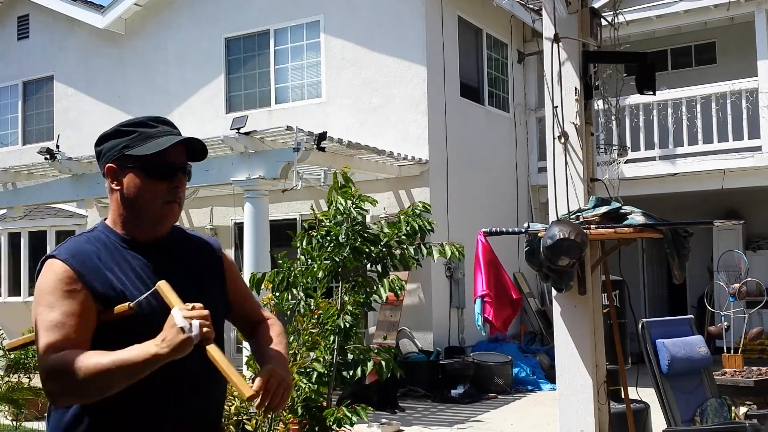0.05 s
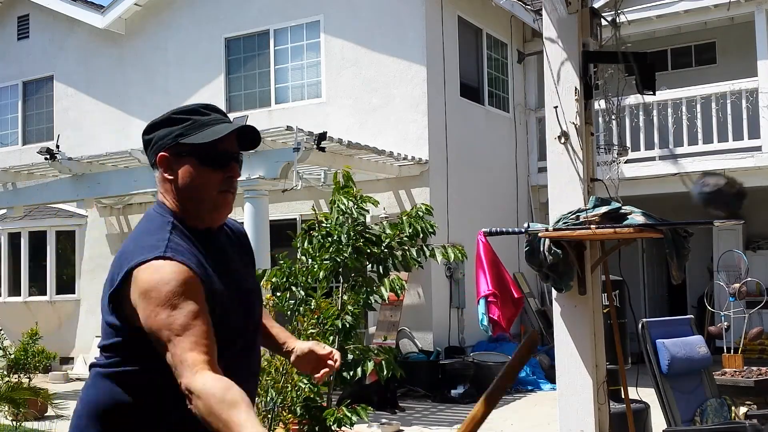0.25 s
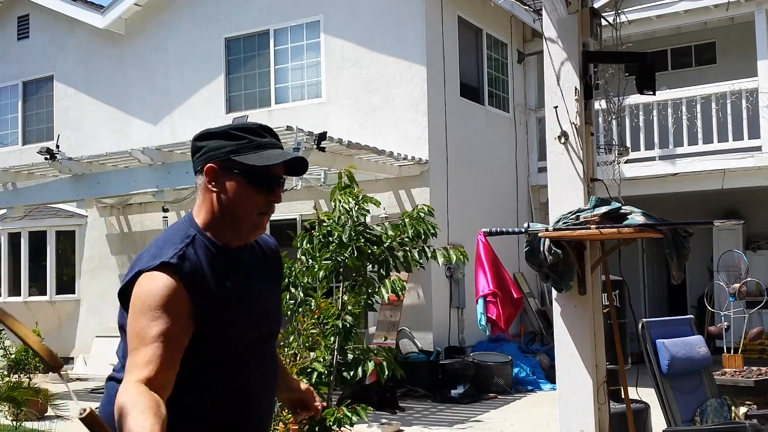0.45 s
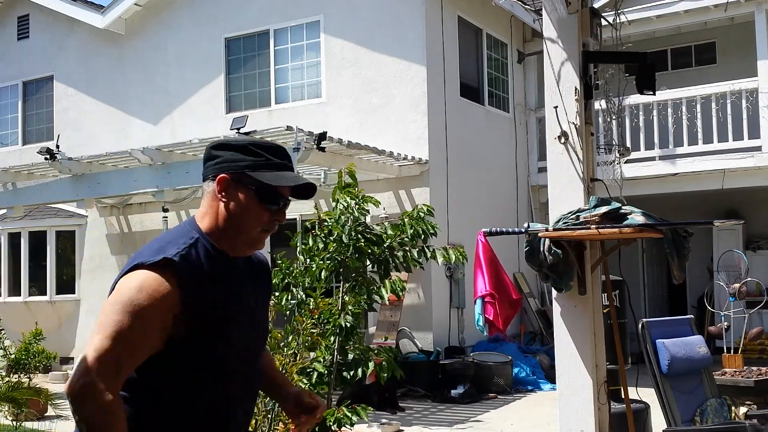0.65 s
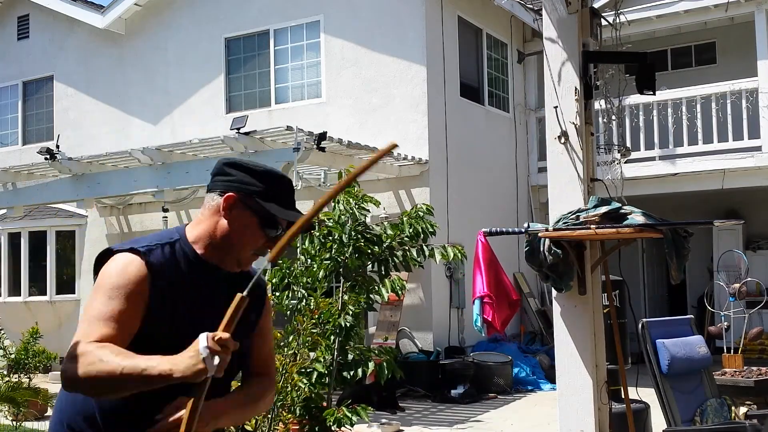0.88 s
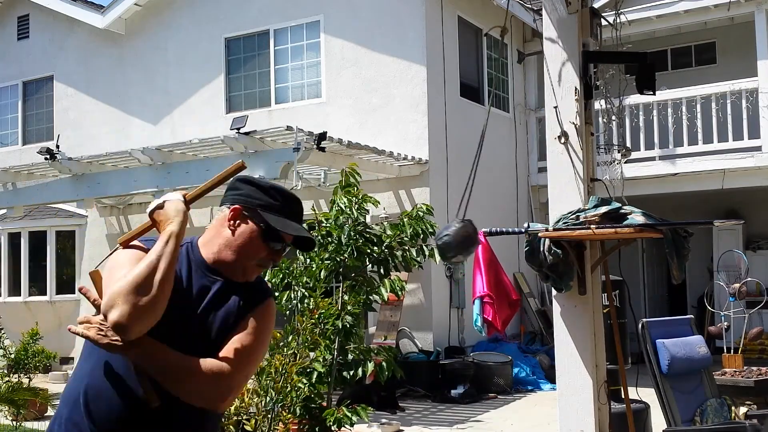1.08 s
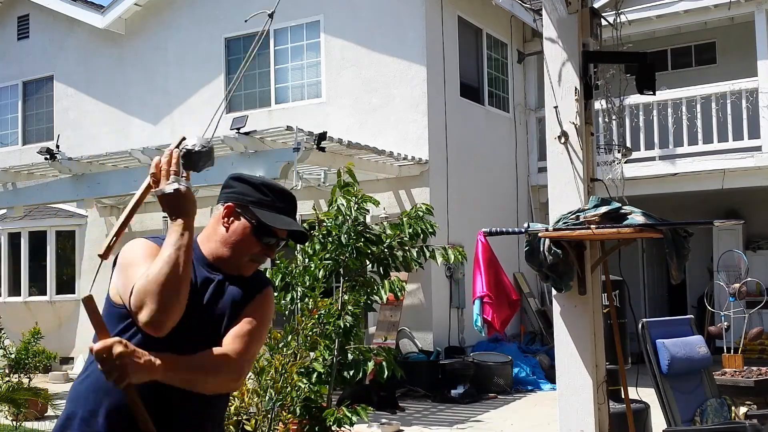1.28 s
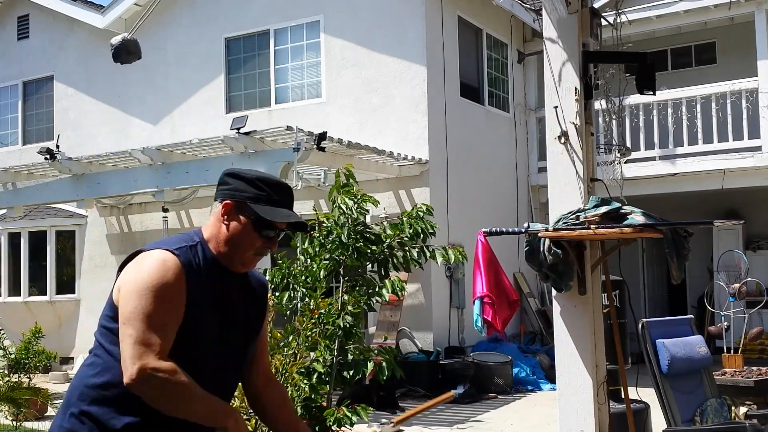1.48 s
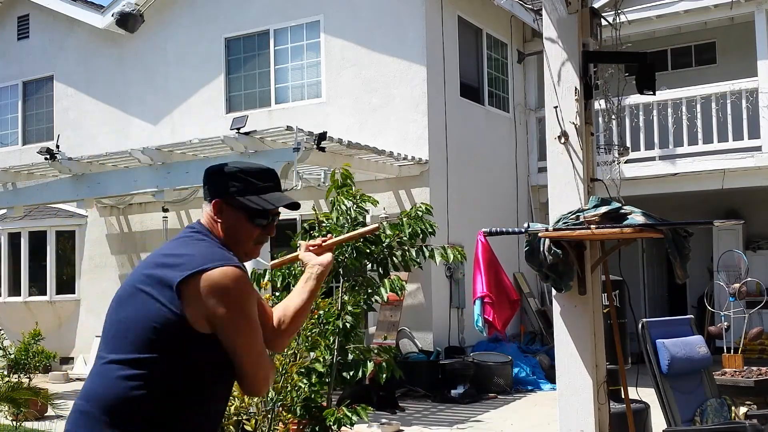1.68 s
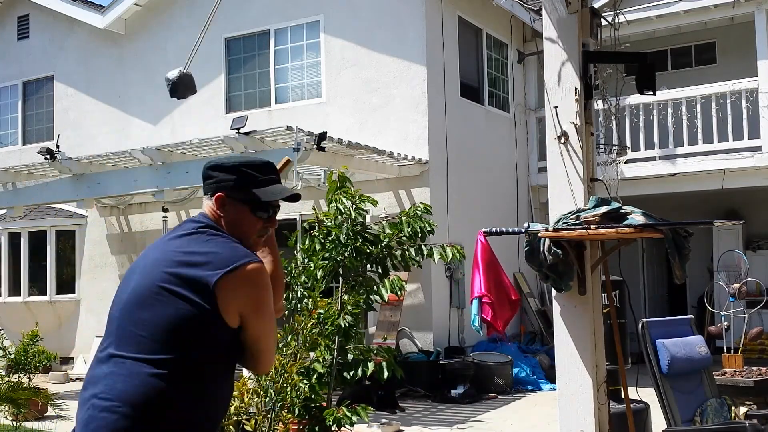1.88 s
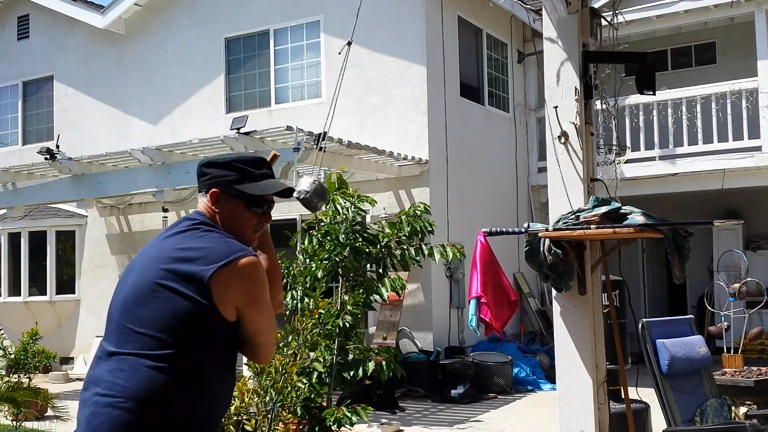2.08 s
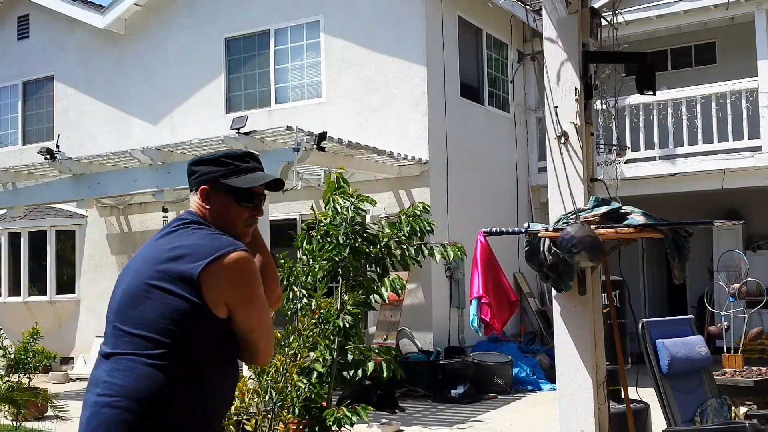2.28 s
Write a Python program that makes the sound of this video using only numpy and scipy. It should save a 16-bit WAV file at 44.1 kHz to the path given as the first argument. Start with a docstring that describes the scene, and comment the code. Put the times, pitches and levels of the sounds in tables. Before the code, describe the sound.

Two quick wooden knocks of sticks on a hanging ball echo briefly in a quiet yard. After a low swish and faint chirps, clothes and shoes rustle while wind rumbles and pops loudly on the microphone.

```python
"""A paved yard under a faint outdoor hush. Clothes and shoes rustle, and wind buffets the two microphone
ports. At 0.2 s and 0.48 s wooden sticks strike a ball hanging on a cord: stick and ball ring, the house
walls throw the cracks back, and the second stroke swishes on past the ball. Small ticks and faint,
bird-like chirps follow, then wind and rustle swell again. From 1.9 s a thin whistle falls away, and
at 2 s the wind pops the left port."""
import sys
import numpy as np
from scipy import signal
from scipy.fft import rfft, irfft
from scipy.io import wavfile
from scipy.ndimage import uniform_filter1d, map_coordinates

SR = 44100
rng = np.random.default_rng(int(sys.argv[2]) if len(sys.argv) > 2 else 0)


def generate_wav(signal):
    """Clip the signal to [-1, 1] and save it as 16-bit WAV at the path in sys.argv[1]."""
    frames = np.transpose(np.atleast_2d(signal))
    scaled = np.clip(frames, -1, 1) * 32767
    pcm = np.round(scaled).astype(np.int16)
    wavfile.write(sys.argv[1], SR, pcm)


N = 108045
T = np.arange(N) / SR
HZ = np.arange(N // 2 + 1) * SR / N + 1

# Pan is left minus right; lag is how late the right port hears; EQ levels are relative, per Hz.
# EQ of the outdoor bed: f/Hz, level/dB
HUSH_EQ = [(25, -22), (50, -6.5), (100, 2), (220, -8.5), (450, -10), (1200, -17.5), (2000, -17),
           (3200, -20), (6200, -19), (9000, -29.5), (13000, -38), (15000, -69)]
# path of the falling whistle: t/s, f/Hz, level/dB
WHISTLE_PATH = [(1.92, 5450, -60), (2.01, 4880, -56), (2.065, 4660, -51), (2.14, 4500, -55),
                (2.22, 4320, -56.5), (2.33, 4210, -60), (2.42, 4080, -61), (2.45, 4050, -66)]
# swell of the breeze's rumble: t/s, level/dB
BREEZE_SWELL = [(0, -44), (.2, -46), (.35, -61), (.6, -54.5), (.8, -63.5), (1.15, -64), (1.34, -54),
                (1.41, -44.5), (1.6, -45), (1.75, -45.5), (1.88, -42), (2.05, -49.5), (2.18, -48.5),
                (2.32, -47.5), (2.45, -53)]
# EQ of that rumble: f/Hz, level/dB
BREEZE_EQ = [(20, -24), (50, -9.5), (105, 1.5), (170, -7.5), (300, -14.5), (600, -54.5)]
# wind buffets on the ports: t/s, half length/s, level/dB, pan/dB, high cut/Hz
BUFFETS = [(0.015, 0.0096, -39, -16, 107), (0.09, 0.0051, -38, -16, 150), (0.1, 0.051, -44.5, 0, 141),
           (0.636, 0.038, -50, -13, 220), (0.936, 0.0085, -45.5, -20.5, 214),
           (0.986, 0.014, -52.5, -16.5, 209), (1.234, 0.012, -46.5, -30, 183),
           (1.272, 0.013, -43, -20, 234), (1.431, 0.0065, -34, -13, 132),
           (1.462, 0.0077, -35.5, -20.5, 325), (1.495, 0.015, -35.5, -13, 226)]
# swell of clothes and shoes: t/s, level/dB, pan/dB
RUSTLE_SWELL = [(0, -39.5, 1), (.065, -39.5, 1.5), (.13, -39, 3), (.19, -41.5, 2.5), (.40, -52, 4.5),
                (.46, -54, 5), (.6, -51.5, 1.5), (.76, -60.5, 5.5), (.93, -55, 4), (1.10, -61.5, 5),
                (1.21, -60, 11), (1.285, -47, 3.5), (1.33, -51.5, 4), (1.39, -44.5, 2), (1.44, -47.5, 2),
                (1.63, -40.5, 1.5), (1.76, -41.5, 4), (1.89, -42.5, 1), (1.97, -41, 3), (1.997, -54.5, 6),
                (2.025, -41, 3), (2.09, -44.5, 1.5), (2.3, -46.5, 2.5), (2.45, -47.5, 3)]
# EQ of the rustle: f/Hz, level/dB
RUSTLE_EQ = [(150, -25.5), (320, -2), (700, -4), (1000, -2), (1400, -7.5), (2000, -2.5), (2900, -8),
             (4300, -10), (6000, -5), (8000, -12), (11000, -22.5), (13000, -31.5), (15000, -60)]
# scuffs, squeaks and, around 0.8-1.0 s, bird-like chirps:
# t/s, f/Hz, level/dB, half length/s, pan/dB, relative width, slide/(octaves per s)
SQUEAKS_AND_CHIRPS = [(0.015, 5800, -36, 0.0045, 5, .3, -3), (0.059, 1950, -36.5, 0.011, 8.5, 0.6, 0),
                      (.402, 2340, -49, .005, 6, .25, 0), (.635, 855, -50, .02, 0, .6, 0),
                      (.822, 3300, -53.5, 0.015, 4, 0.21, -18.5), (.862, 5930, -43, 0.00095, 12, 0.13, 0),
                      (0.875, 3030, -58, 0.025, 2, 0.15, 2.5), (0.908, 1600, -57.5, .012, 8, 0.3, 2.5),
                      (0.936, 7540, -49.5, 0.006, 1, 0.3, 1), (0.951, 5800, -51, 0.0033, 4, .2, 0),
                      (0.966, 2150, -56.5, 0.0051, 11, 0.13, -2),
                      (0.967, 3480, -54.5, 0.0057, 5, 0.17, -14), (.997, 2500, -57, 0.0055, 8, 0.16, 10),
                      (1.119, 6200, -53.5, .004, 3, .2, 0), (1.665, 6400, -44, 0.0068, 3, 0.41, 0),
                      (1.722, 2080, -46.5, 0.011, 15, 0.34, 1), (1.74, 800, -45.5, 0.016, 2.5, .6, 0),
                      (1.824, 940, -46, 0.021, 3, 0.5, 0.5), (1.845, 7850, -31.5, 0.0023, 0, 0.079, 0),
                      (1.871, 5750, -42.5, 0.0046, 9, .15, 0), (1.939, 5800, -39, .003, 8.5, 0.2, 0),
                      (2.102, 5800, -44, .003, 10, .12, 0), (2.182, 5940, -44, 0.006, 13, 0.12, 2),
                      (2.406, 6760, -43.5, 0.0045, 3, 0.17, 0)]
# ticks of sticks, cord and shoes: t/s, level/dB, pan/dB, f/Hz, t60/s
TICKS = [(0.1933, -29.5, 3, 5200, 0.0055), (.1995, -38, -2, 5500, .03), (0.4292, -42.5, 5, 7500, 0.015),
         (.455, -44.5, 5, 5800, 0.018), (0.6237, -31, -8, 4380, 0.012), (1.041, -46, -4, 5200, 0.075),
         (1.374, -51.5, -11, 4540, .08), (1.397, -47.5, -5, 7500, .012), (1.605, -40, -6, 3340, 0.096),
         (1.741, -39.5, 4, 3500, 0.055), (1.815, -45.5, -1, 3700, 0.18)]
# path of the follow-through's swish: t/s, f/Hz, level/dB
SWISH_PATH = [(.47, 751, -61), (.487, 601, -35), (.505, 445.6, -35), (.518, 335, -33), (.532, 226.5, -40),
              (.58, 209, -48), (.64, 170, -64)]
# EQ of the cracks and the yard's echo: f/Hz, level/dB
YARD_EQ = [(100, -25), (250, -4.5), (400, -6), (580, -3.5), (780, -5.5), (1300, -5.5), (2800, -8),
           (4300, -7), (5800, 0.5), (8000, -7.5), (11000, -19.5), (13000, -30.5), (15000, -50)]
# narrow rings that hang on after a blow: f/Hz, relative level/dB
RINGS = [(409, -15.5), (481, -14.5), (530, -16.5), (600, -11), (980, -14), (1363, -17.5), (1513, -21),
         (2336, -20), (3890, -17), (4486, -19), (4810, -21), (5190, -18), (5270, -22), (5813, -19),
         (6250, -19), (6550, -22), (6845, -15), (8250, -20), (8830, -25)]
# early slaps off paving and walls: pan/dB, lag/s, send from first blow/dB, send from second/dB
SLAPS = [(-4, .0001, -20, -17), (2, .0001, -12, -24), (1, .0003, -14.5, -15), (-1.5, 0.0033, -5.5, -16)]
SLAP_DELAYS_S = (.0021, .0053, .0127, .0187)
# modes of stick and ball: f/Hz, t60/s, weight in first blow/dB, weight in second/dB
KNOCK_MODES = [(484, 0.022, -3, -11), (790, 0.027, -16, -5.5), (1210, 0.0082, -6, -4),
               (1485, 0.0076, -3.5, 5.5), (1860, 0.02, -9.5, 2.5), (2374, 0.037, -22, 0),
               (3090, 0.0084, -6, 4), (3780, 0.0092, -10, 4), (4210, 0.017, -10, 0.5),
               (5080, 0.0055, 4.5, -15), (5800, 0.0091, 3, 5), (6620, 0.0055, -5, 2),
               (7450, 0.0057, -4, -11), (8340, 0.0042, -3, 7)]
# the two blows: t/s, knock gain/dB, pan/dB, lag/s, echo level/dB, tilt of the yard EQ/(dB per octave),
# crack level within the knock/dB, gain of the rings/dB
BLOWS = [(0.2034, -3, 1, 0.00001, -19, -0.5, -4.5, -10.5),
         (0.4794, -15.5, 5, 0.00025, -26, -2.5, 0.5, -27.5)]
# tone difference between the microphone ports: f/Hz, left minus right/dB
PORT_BALANCE = [(400, 0), (1100, 2), (2200, 3.5), (5000, 1.5), (8500, -5.5), (14000, -18.5)]


def undb(db):
    """Decibels to gain."""
    return 10 ** (np.asarray(db) / 20)


def unit(x):
    """Scale to rms 1."""
    return x / np.sqrt(np.mean(x ** 2))


def pan(db):
    """Left and right gains for a level difference."""
    return undb(np.array([db, -db]).reshape(2, -1) / 2)


def curve(table):
    """The columns of a timed table, joined by straight lines."""
    times, *columns = np.array(table).T
    return [np.interp(T, times, c) for c in columns]


def noise(gain, likeness):
    """Stereo noise of rms 1 with spectrum gain(HZ); likeness runs from 0 (wide) to 0.98 (nearly mono)."""
    mid, side = rfft(rng.standard_normal((2, N)))
    spectrum = np.sqrt(1 + likeness) * mid + np.sqrt(1 - likeness) * side * np.array([[1], [-1]])
    return unit(irfft(spectrum * gain(HZ), N))


def eq(points, tilt_db=0.):
    """A spectrum through (Hz, dB) points, tilted per octave."""
    hz, db = np.array(points).T
    return lambda f: undb(np.interp(np.log(f), np.log(hz), db)
                          + tilt_db * np.log2(np.clip(f, hz[0], hz[-1])))


def band(hz, width):
    """A resonant band of relative width."""
    return lambda f: 1 / (1 + ((f / hz - hz / f) / width) ** 2)


def decay(start, t60):
    """A hard attack and an exponential tail."""
    return (T >= start) * np.exp(-np.log(1000) * np.clip((T - start) / t60, 0, 10))


def delay(x, seconds):
    """Delay a signal by whole samples."""
    return np.interp(np.arange(N) - np.round(seconds * SR), np.arange(N), x, left=0, right=0)


def wander(per_s):
    """Smooth random motion with a spread near 1."""
    span = int(SR / per_s)
    return unit(uniform_filter1d(uniform_filter1d(rng.standard_normal(N), span), span))


def glide(path, width, steady):
    """A noise band and a pure tone following a path; steady is the tone's share of the power."""
    hz, db = curve(path)
    flutter = noise(lambda f: 1 / (1 + (2 * f / (width * hz.mean())) ** 2), likeness=0.98)
    wobble = np.sqrt(steady) + np.sqrt(1 - steady) * flutter
    tone = np.sqrt(2) * np.sin(2 * np.pi * np.cumsum(hz) / SR)
    gate = (T > path[0][0]) * (T < path[-1][0])
    return undb(db) * gate * wobble * tone


def mode(start, hz, t60, turns=0.):
    """A struck, decaying sine, cut after a quarter of a second."""
    age = T[:int(.25 * SR)]
    ring = np.exp(-np.log(1000) * age / t60) * np.sin(2 * np.pi * (hz * age + turns))
    return np.pad(ring, (int(start * SR), N))[:N]


def hush():
    """A faint, wide bed of distant outdoor noise."""
    return undb(-54) * noise(eq(HUSH_EQ), likeness=0.26)


def whistle():
    """A thin, fluttering whistle slides down on the right."""
    return glide(WHISTLE_PATH, width=0.023, steady=0.34) * pan(-9)


def wind():
    """A low breeze, and short buffets that strike mostly one port."""
    out = undb(curve(BREEZE_SWELL)[0]) * noise(eq(BREEZE_EQ), likeness=0.86)
    for start, length, db, pan_db, top_hz in BUFFETS:
        eddy = noise(lambda f: f / np.hypot(f, 60) / (1 + (f / top_hz) ** 4), likeness=0)
        out += undb(db) * pan(pan_db) * np.exp(-((T - start) / length) ** 2 / 2) * eddy
    return out


def port_pop(start_s=2.0027, step_db=3.5, bass_cut_hz=92.6, damping=0.75, ceiling=0.92):
    """A pressure step overloads the left port; the microphone's bass cut swings it back to rest."""
    omega = 2 * np.pi * bass_cut_hz
    bass_cut = signal.bilinear([1, 0, 0], [1, 2 * damping * omega, omega ** 2], SR)
    thump = signal.lfilter(*bass_cut, undb(step_db) * (T >= start_s))
    return np.array([np.minimum(thump, ceiling), np.zeros(N)])


def rustle(grain_db=2.5, flutter_db=0.4, patch_db=2.5, diffuse_hz=1190, lag_s=.00042):
    """Cloth and soles rub with the player's motion: a grainy, patchy hiss."""
    db, pan_db = curve(RUSTLE_SWELL)
    grain = unit(undb(grain_db * wander(per_s=800) + flutter_db * wander(per_s=72)))
    likeness = 0.92 / (1 + (HZ / diffuse_hz) ** 2)  # the highs arrive from all sides
    hiss = rfft(noise(eq(RUSTLE_EQ), likeness))
    third_octave = np.floor(3 * np.log2(np.clip(HZ, 250, 11000)))
    patchy = sum(irfft(hiss * (third_octave == k), N) * undb(patch_db * wander(per_s=42))
                 for k in np.unique(third_octave))  # each band flickers on its own
    out = undb(db) * pan(pan_db) * grain * unit(patchy)
    out[1] = delay(out[1], lag_s)  # the player stands to the left
    return out


def squeaks_and_chirps():
    """Clothes and shoes scuff and squeak; faint, bird-like chirps sound around 0.8-1.0 s."""
    out = np.zeros((2, N))
    for peak_s, hz, db, length, pan_db, width, slide in SQUEAKS_AND_CHIRPS:
        speed = 2 ** (slide * np.clip(T - peak_s, -3 * length, 3 * length))  # bends the pitch
        position = peak_s * SR + np.cumsum(speed) - speed[T < peak_s].sum()
        hiss = noise(band(hz, width), likeness=0.27)
        bent = np.array([map_coordinates(side, [position], order=1, mode="mirror") for side in hiss])
        out += undb(db) * pan(pan_db) * np.exp(-((T - peak_s) / length) ** 2) * bent
    return out


def ticks(width=0.93, top_hz=11800, echo_db=-11.5):
    """Light contacts of sticks, cord and shoes, each with a little yard echo."""
    out = np.zeros((2, N))
    for start, db, pan_db, hz, t60 in TICKS:
        envelope = decay(start, t60) + undb(echo_db) * decay(start, t60=0.24)
        click = noise(lambda f: band(hz, width)(f) / (1 + (f / top_hz) ** 8), likeness=0.18)
        out += undb(db) * pan(pan_db) * envelope * click
    return out


def swish():
    """Eddies shed behind the stick drop in pitch as the swing slows."""
    return glide(SWISH_PATH, width=0.68, steady=.35) * pan(1)


def wall_slaps(knock, stroke):
    """Paving and walls throw back four early copies of the knock."""
    out = np.zeros((2, N))
    for delay_s, (pan_db, lag, *send_db) in zip(SLAP_DELAYS_S, SLAPS):
        slap = np.array([delay(knock[0], delay_s), delay(knock[1], delay_s + lag)])
        out += undb(send_db[stroke]) * pan(pan_db) * slap
    return out


def yard_echo(start, echo_db, tilt_db, rings_db, late_db=-12.5, build_s=0.0026):
    """The whole yard answers: a quick bloom, a softer long tail and narrow rings."""
    tail = decay(start, t60=0.18) + undb(late_db) * decay(start, t60=0.49)
    echo = undb(echo_db) * tail * noise(eq(YARD_EQ, tilt_db), likeness=0.2)
    for hz, db in RINGS:
        t60 = 0.18 * (hz / 1000) ** -.15  # higher rings die sooner
        phases = rng.random() + rng.random(2) / 2
        echo += undb(rings_db + db) * np.array([mode(start, hz, t60, turns) for turns in phases])
    return echo * (1 - np.exp(-np.maximum(T - start, 0) / build_s))


def stick_blows(low_cut_hz=170):
    """Each blow cracks and rings stick and ball, too small to radiate bass; walls and yard answer."""
    out = np.zeros((2, N))
    for stroke, (start, db, pan_db, lag, echo_db, tilt_db, crack_db, rings_db) in enumerate(BLOWS):
        body = sum((-1) ** j * undb(weight_db[stroke]) * mode(start, hz, t60)
                   for j, (hz, t60, *weight_db) in enumerate(KNOCK_MODES))
        crack = undb(crack_db) * decay(start, t60=0.012) * noise(eq(YARD_EQ, tilt_db), likeness=0.52)
        knock = undb(db) * (body / 2 + crack)
        out += pan(pan_db) * np.array([knock[0], delay(knock[1], lag)])
        out += wall_slaps(knock, stroke)
        out += pan(pan_db / 2) * yard_echo(start, echo_db, tilt_db, rings_db)
    return signal.sosfilt(signal.butter(2, low_cut_hz, "high", fs=SR, output="sos"), out)


def scene():
    """The mix: everything in the yard, over the distant hush."""
    return (hush() + stick_blows() + ticks() + swish() + rustle() + squeaks_and_chirps()
            + wind() + port_pop() + whistle())


def record(dry, top_hz=14900):
    """The right port has more air. Loud peaks clip, and the highest treble is filtered off."""
    balance = eq(PORT_BALANCE)(HZ)
    heard = irfft(rfft(dry) * np.sqrt([balance, 1 / balance]), N)
    high_cut = signal.ellip(8, .2, 70, top_hz, fs=SR, output="sos")
    return signal.sosfilt(high_cut, np.clip(heard, -1, 1))


dry = scene()
out = record(dry)
generate_wav(out)
```